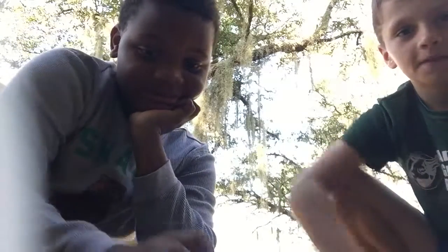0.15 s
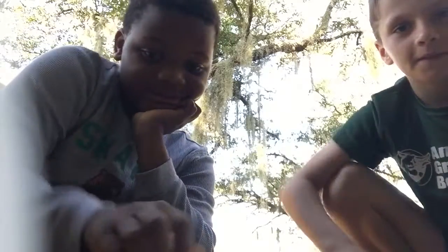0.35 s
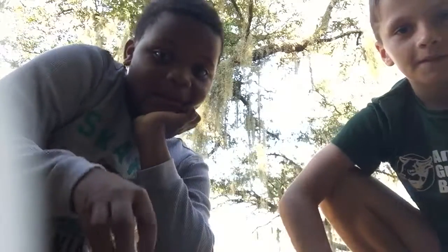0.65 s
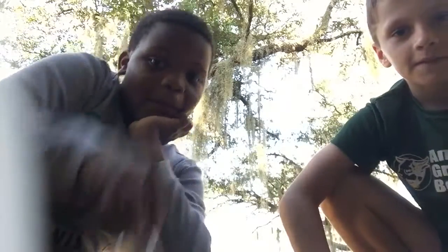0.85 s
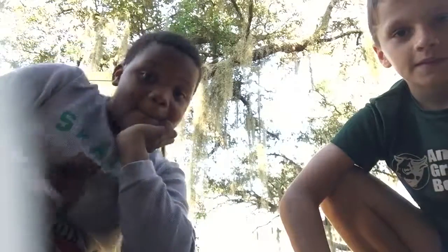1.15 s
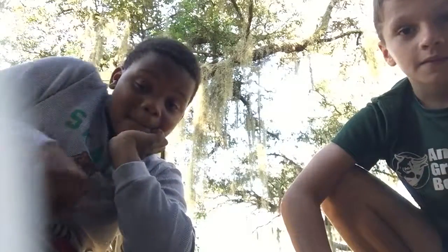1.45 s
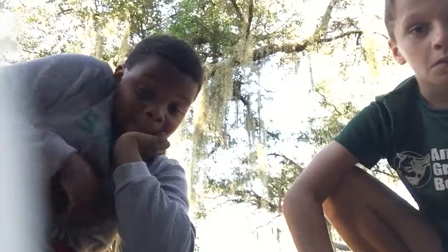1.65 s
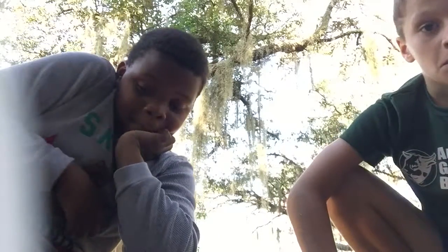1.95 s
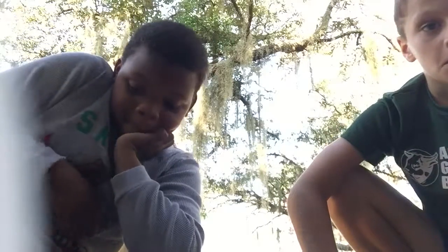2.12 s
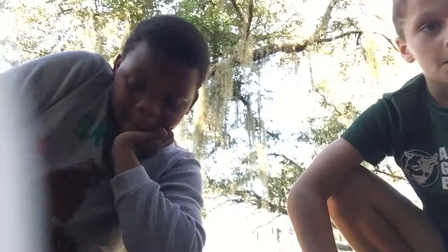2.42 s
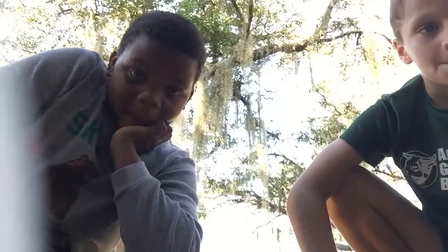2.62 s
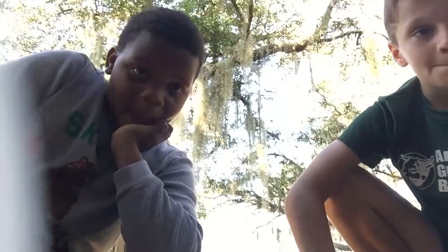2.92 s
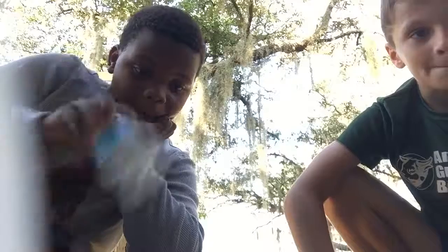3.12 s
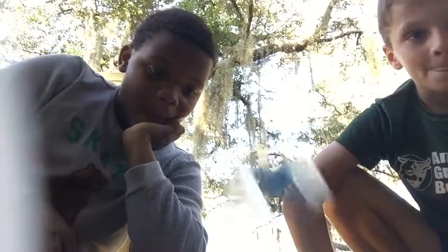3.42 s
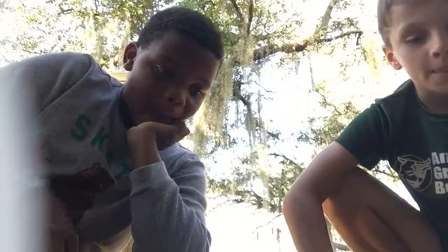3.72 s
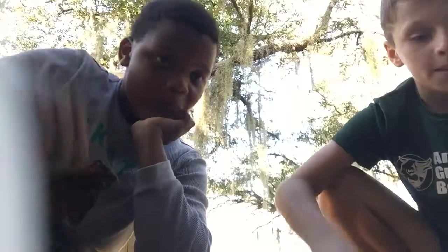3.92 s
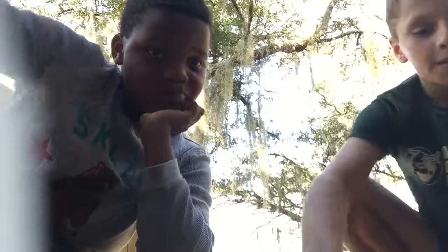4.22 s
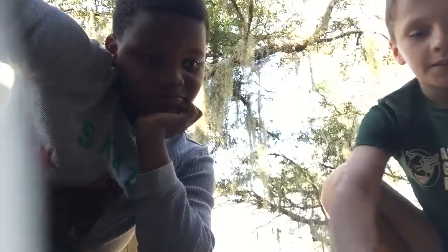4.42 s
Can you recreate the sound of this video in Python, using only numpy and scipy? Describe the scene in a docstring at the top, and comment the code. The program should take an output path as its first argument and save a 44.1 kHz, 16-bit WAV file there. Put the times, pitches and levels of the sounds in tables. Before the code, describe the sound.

A plastic bottle with some water in it is handled, tossed and lands on a hard floor, twice. The first landing is a quick cluster of crackly knocks; the second is a heavy hollow thump, slightly overloading the nearby microphone, with slapping rebounds. Between them come cloth rustle, faint clicks and wall pops. Distant steady humming and open air lie underneath, with only a short echo.

```python
"""A porch floor, microphone close: two children flip a part-filled plastic water bottle.
Sleeves rustle as shaped noise, and the thin wall pops in the hand as short pitched rings.
The bottle lands twice: damped modes, crackle and low rings, with rebounds as the water slaps down after it.
It skids as grainy noise, and is grabbed again.
Two distant motors hum as unsteady sine multiples, over a bed of outdoor air noise."""
import sys
import numpy as np
from scipy import signal
from scipy.fft import rfft, irfft, next_fast_len
from scipy.io import wavfile
from scipy.ndimage import uniform_filter1d, map_coordinates

SR = 44100
rng = np.random.default_rng(int(sys.argv[2]) if len(sys.argv) > 2 else 0)


def int16_out(signal):
    """Quantize to a 16-bit WAV file."""
    q = np.round(np.clip(np.atleast_2d(signal).T, -1, 1) * 32767)
    wavfile.write(sys.argv[1], SR, q.astype(np.int16))


N = 201081

# The bottle strikes floor or hand; weight lifts the thud, hardness the crack and snap.
# [t/s, level/dB, weight/dB, hardness/dB, loss per rebound/dB, pitch of struck patch f/Hz, its ring level/dB]
KNOCK_EVENTS = [(1.084, -29.5, -14, -5, 20, 1500, -37), (1.7539, -20, 1.5, 2, 9.5, 2470, -1.5),
                (1.822, -29, -1, -22, 5, 1430, -16.5), (1.844, -20.5, -7.5, -14, 6.5, 1150, -13),
                (1.871, -17.5, -1, -10.5, 7, 2000, -8), (1.891, -19, -7, -3.5, 18, 1493, -7),
                (2.077, -37.5, -24, -13.5, 28, 2220, -23), (2.861, -37, -3, -32, 21, 1016, -20),
                (2.8712, -32, 4.5, 0.5, 34, 756, -15), (3.181, -29.5, -22, 2.5, 12, 7000, -11),
                (3.1855, -29.5, -4, 11, 17, 1567, -5.5), (3.5306, -7.5, 0, -14.5, 15, 511, -2),
                (3.538, -11.5, -13, -6, 8.5, 1180, -7), (3.553, -14.5, 1.5, -2.5, 7.5, 745, -8),
                (3.719, -29, -20, -0.5, 7.5, 1930, -22), (3.928, -39, 6, -15, 5, 512, -28),
                (4.128, -21, -5, -6, 35, 1257, -16.5), (4.143, -19.5, -19, -9.5, 19, 1120, -27),
                (4.161, -20.5, -6, -1, 35, 1100, -13), (4.198, -15.5, -23, -4, 30, 943, -9),
                (4.229, -30, -12, -2, 24, 1297, -12), (4.3252, -33.5, -14, 4.5, 11, 1310, -28),
                (4.416, -37, -4, 1.5, 10, 2140, -26)]
# The thin wall pops under the fingers: [t/s, level/dB, f/Hz, ring above that level/dB]
POP_EVENTS = [(.012, -48, 1300, 20), (0.033, -35.5, 4960, 14.5), (.134, -41, 3880, 11),
              (.216, -43, 1880, 6), (0.265, -36, 6200, 6), (.283, -37, 3370, 3), (0.348, -35, 5200, 3),
              (.475, -38, 4400, 17), (.519, -41.5, 3980, 17), (.77, -49, 1280, 20),
              (0.846, -52.5, 1480, 20.5), (1.218, -44, 2330, 14.5), (2.545, -47.5, 3700, 11.5),
              (2.67, -43.5, 3750, 13.5), (2.8212, -21, 4610, 19.5), (3.036, -46, 3960, 12.5),
              (3.377, -66, 3980, 22), (3.681, -43, 4280, 5), (3.755, -40.5, 2240, 18)]


def amp(db):
    """Amplitude factor of a level in dB."""
    return 10 ** (np.asarray(db) / 20)


def unit(x):
    """x scaled to rms 1."""
    return x / np.sqrt(np.mean(x ** 2) + 1e-20)


def along(points, hz):
    """Interpolate (f/Hz, value) points on a log frequency axis."""
    f, values = np.transpose(points)
    return np.interp(np.log(hz + 1), np.log(f), values)


def wobble(rate):
    """A smooth random curve through rate knots a second."""
    knots = rng.standard_normal(int(N * rate / SR) + 4)
    return map_coordinates(knots, [np.arange(N) * rate / SR])


def filtered(x, response):
    """x with its spectrum multiplied by a function of frequency."""
    size = next_fast_len(N + SR // 2)
    hz = np.fft.rfftfreq(size, 1 / SR)
    return irfft(rfft(x, size) * response(hz), size)[:N]


def coloured(x, spectrum):
    """x filtered by (f/Hz, level/dB) points, then scaled to rms 1."""
    return unit(filtered(x, lambda hz: amp(along(spectrum, hz))))


def add(track, s, sound):
    """Mix a sound into the track at time s."""
    place = track[max(0, round(s * SR)):][:len(sound)]
    place += sound[:len(place)]


def hum(hz, orders, drift=0.061, waver_db=1):
    """A distant motor: multiples of its shaft speed, with drifting phase (rad) and wavering levels."""
    turn = 2 * np.pi * hz * np.arange(N) / SR + drift * wobble(3.4)
    out = np.zeros(N)
    for multiple, db in orders:
        level = np.sqrt(2) * amp(db + waver_db * wobble(14))  # rms to peak
        out += level * np.sin(multiple * turn + rng.uniform(0, 2 * np.pi))
    return out


def motors():
    """Two distant motors turn at different shaft speeds, each with its own set of multiples."""
    # Tones of each motor: [multiple of shaft speed, mean level/dB rms]
    slow_motor = [(2, -59), (3, -50), (4, -47), (5, -57.5), (7, -58.5), (8, -63)]
    fast_motor = [(2, -50), (3, -55), (4, -66.5)]
    return hum(52.8, slow_motor) + hum(96.7, fast_motor)


def outdoor_air(level_db=-46.5):
    """The air around the porch: steady noise, strongest in the low-mids."""
    # Spectrum of the open air: [f/Hz, level/dB per Hz]
    air_spectrum = [(25, -34), (55, -30), (85, -12.5), (200, 2.5), (330, 1.5), (500, -12.5), (800, -10.5),
                    (1300, -10), (2100, -17.5), (2700, -38), (4500, -43), (6500, -56.5), (9000, -61),
                    (16000, -81)]
    return amp(level_db) * coloured(rng.standard_normal(N), air_spectrum)


def strokes():
    """Envelopes of rub, swish and hiss: each stroke rises, holds and falls away."""
    # Sleeves and hands slide; bright strokes hiss, dull ones rub; levels precede the layer gains.
    # [t/s, length/s, level/dB, brightness/dB]
    slides = [(0, 0.019, -38.5, -7), (.02, 0.12, -49, -10), (0.146, .11, -45, -6.5),
              (0.258, 0.029, -39, 6.5), (0.288, 0.12, -46, -4.5), (0.361, 0.015, -39, 6),
              (0.432, 0.17, -51, -5), (0.539, 0.083, -48.5, -4), (0.635, 0.026, -44, 5),
              (0.696, 0.32, -49.5, 0), (0.878, 0.031, -53, 19), (1.028, 0.052, -38, 7.5),
              (1.121, .2, -51.5, 4.5), (1.285, 0.032, -46, 8.5), (1.348, .18, -65, 1),
              (1.895, 0.257, -62.5, -19), (2.432, 0.048, -57.5, 4.5), (2.53, 0.16, -54.5, -17),
              (2.786, 0.14, -52.5, -4), (3.027, 0.013, -50.5, 2), (3.18, 0.11, -58.5, 5.5),
              (3.245, 0.013, -36, 1.5), (3.59, 0.312, -56.5, -2), (3.905, 0.19, -53, -5.5),
              (4.166, 0.14, -51, 3), (4.306, 0.066, -47, 6), (4.368, .18, -51, 4), (4.5, 0.03, -45, -10)]
    rise, fall = 0.0071, 0.013  # time constants, s
    rub_per_bright = -0.17  # dB of rub per dB of brightness
    t, power = np.arange(N) / SR, np.zeros((3, N))
    for s, length, db, bright in slides:
        since = np.maximum(t - s, 0)
        after = np.maximum(since - length, 0)
        shape = (1 - np.exp(-since / rise)) * np.exp(-after / fall)
        levels = [db + rub_per_bright * bright, db, db + bright]
        power += np.outer(amp(levels), shape) ** 2
    return np.sqrt(power)


def patchy(x, depth_db):
    """Each moving fold favours its own frequencies for a moment."""
    z = signal.stft(x, nperseg=512)[2]
    field = uniform_filter1d(rng.standard_normal(z.shape), size=4, axis=0)  # over frequency
    field = uniform_filter1d(field, size=8, axis=1)  # over time
    return signal.istft(z * amp(depth_db * unit(field)), nperseg=512)[1][:N]


def rustle(rub_db=3, swish_db=-2, hiss_db=-8.0, grain_db=2.5, clump_db=2, stroke_db=2, patchy_db=3.5,
           crinkle_db=-2, crinkle_rate=60):
    """Cloth catches and slips in clumps of tiny grains, while the fingers crinkle the bottle."""
    # Spectra of three cloth layers and of the crinkling wall: [f/Hz, level/dB per Hz]
    rub_spectrum = [(150, -35), (300, -7), (550, 8), (900, -1.5), (1400, 4), (2300, -2.5), (3200, -16),
                    (7000, -57.5)]
    swish_spectrum = [(300, -43), (1600, -22.5), (2600, -2), (4400, 10.5), (5500, -1), (7000, -23.5),
                      (9000, -29.5), (13000, -52)]
    hiss_spectrum = [(2000, -53.5), (5000, -15), (6500, 2.5), (8200, -4.5), (10000, -8.5), (11500, -11.5),
                     (15500, -20)]
    crinkle_spectrum = [(300, -20.5), (600, 0), (1400, -8), (2300, 17.5), (4200, 2), (6000, 4.5),
                        (10000, -39.5), (16000, -30.5)]
    rub, swish, hiss = strokes()
    grip = amp(grain_db * wobble(500) + clump_db * wobble(60))

    def cloth(spectrum):
        """One layer shares the grip but also catches on its own."""
        catch = amp(stroke_db * wobble(90))
        return coloured(grip * catch * patchy(rng.standard_normal(N), patchy_db), spectrum)

    sleeves = amp(rub_db) * rub * cloth(rub_spectrum)
    sleeves += amp(swish_db) * swish * cloth(swish_spectrum)
    sleeves += amp(hiss_db) * hiss * cloth(hiss_spectrum)

    # crinkle_rate random impulses a second, each spread into a short noise burst
    impulses = (rng.random(N) < crinkle_rate / SR) * rng.standard_normal(N)
    t = np.arange(SR // 100) / SR
    burst = rng.standard_normal(len(t)) * amp(-60 * t / 0.012)  # t60 of 12 ms
    crinkles = signal.fftconvolve(impulses, burst)[:N]
    return sleeves + amp(crinkle_db) * swish * coloured(crinkles, crinkle_spectrum)


def blows():
    """Rows (s, thud, knock, crack, snap dB) for every knock, its rebounds and every pop."""
    # Balance of a pop, one row of [thud/dB, knock/dB, crack/dB, snap/dB]
    pop_balance = [-15, -5, -2, -10]
    rebound_s, strike_count = 0.0117, 3  # the count includes the first strike
    softer_db = 0.5  # hardness lost at each rebound
    snap_db, snap_grows = -12, 1.25  # snap relative to the knock, and its growth per dB of hardness
    rows = [(s, *(db + np.array(pop_balance))) for s, db, *patch in POP_EVENTS]
    for s, db, weight, hardness, loss, *patch in KNOCK_EVENTS:
        for k in range(strike_count):
            level, hard = db - k * loss, hardness - k * softer_db
            snap = level + snap_db + snap_grows * hard
            rows.append((s + k * rebound_s, level + weight, level, level + hard, snap))
    return rows


def contacts(scatter_db=2.0, rise=0.000088, level_db=-1):
    """Each contact rings the bottle and crackles its wall; hard ones are bright, water-laden ones deep."""
    # Bands of thud, knock, crack and snap: [low f/Hz, high f/Hz]
    band_edges = [(70, 450), (450, 1800), (1800, 5500), (5500, 16000)]
    # Those four bands die at their own speeds: [noise t60/s, share of noise 0-1]
    band_decay = [(0.19, 0.22), (0.033, 0.46), (0.025, 0.53), (0.022, 1)]
    # Modes of the water-loaded bottle on the floor: [f/Hz, mean level/dB, t60/s]
    bottle_modes = [(208, 0, 0.043), (261.2, 1.5, 0.13), (302, 3.5, 0.089), (362, -0.5, 0.066),
                    (412.5, 0.5, 0.072), (470, -18, .05), (515, 4.5, 0.084), (674, -2.5, 0.083),
                    (736, 4.5, 0.081), (870, -16.5, 0.026), (1018, 6, 0.065), (1178, 7.5, 0.045),
                    (1311, 12, 0.037), (1510, -17.5, 0.027), (2002, 2.5, 0.03), (2160, 8, 0.039),
                    (2374, 5.5, 0.033), (3310, 3, 0.034), (3977, 5.5, 0.025), (4736, -17.5, .03),
                    (6500, 4.5, 0.022)]
    out, t = np.zeros(N), np.arange(SR // 5) / SR
    span = SR / 100  # levels are rms over 10 ms
    hz, mode_db, mode_t60 = np.transpose(bottle_modes)[:, :, None]
    filters = [signal.butter(4, band, "band", fs=SR, output="sos") for band in band_edges]
    for s, *levels in blows():
        strength, detune, sign = rng.standard_normal((3, len(bottle_modes), 1))
        # the water shifts, so the modes differ a little from blow to blow
        waves = np.sign(sign) * np.sin(2 * np.pi * hz * (1 + 0.017 * detune) * t)
        decay = amp(mode_db + scatter_db * strength - 60 * t / mode_t60)
        ring = np.sum(decay * waves, axis=0)
        for sos, db, (t60, share) in zip(filters, levels, band_decay):
            crackle = rng.standard_normal(len(t)) * amp(-60 * t / t60) * (1 - np.exp(-t / rise))
            tone, noise = signal.sosfilt(sos, [ring, crackle])
            blow = unit(np.sqrt(1 - share) * unit(tone) + np.sqrt(share) * unit(noise))
            add(out, s, amp(db + level_db) * np.sqrt(span / len(t)) * blow)
    return out


def rings(rise=0.00054, rough=0.12):
    """Wall patches and low bottle rings each sound one pitch, its phase shaken (rad rms) by the water."""
    # Low rings of the bottle, gulps and struck shell, each with its own length:
    # [t/s, f/Hz, starting level/dB, t60/s]
    low_rings = [(1.085, 248, -18.5, 0.083), (1.086, 184.7, -20.5, 0.31), (1.087, 385.5, -28.5, .18),
                 (1.166, 195.2, -24, 0.18), (1.781, 345, -11, 0.074), (1.8715, 515, -2.5, 0.027),
                 (2.8645, 369, -12, 0.062), (3.186, 541, -21.5, .12), (3.531, 195.4, -4, 0.1)]
    # Low-pitched wall patches ring longer: [f/Hz, t60/s]
    wall_decay = [(500, 0.045), (1200, 0.036), (2400, 0.015), (4500, 0.016)]
    patches = [(s, hz, db) for s, *blow, hz, db in KNOCK_EVENTS]
    patches += [(s, hz, db + ring) for s, db, hz, ring in POP_EVENTS]
    tones = [(s, hz, db, along(wall_decay, hz)) for s, hz, db in patches]
    out, t = np.zeros(N), np.arange(SR // 4) / SR
    for s, hz, db, t60 in tones + list(low_rings):
        shake = rough * unit(uniform_filter1d(rng.standard_normal(len(t)), size=120))
        envelope = amp(db - 60 * t / t60) * (1 - np.exp(-t / rise))
        add(out, s, envelope * np.sin(2 * np.pi * hz * t + shake))
    return out


def skids(grain_db=2.5, sag_db=5):
    """Ribbed plastic chatters over the floor in dense little slips."""
    # The bottle skids and its water churns between blows: [t/s, length/s, mid-skid level/dB]
    slips = [(1.042, 0.047, -40.5), (1.746, 0.069, -26), (1.812, 0.075, -29), (1.869, 0.035, -24),
             (3.162, 0.024, -36), (3.527, 0.069, -25), (3.71, 0.19, -54), (4.112, 0.065, -36.5)]
    # Spectrum of plastic on the floor: [f/Hz, level/dB per Hz]
    skid_spectrum = [(200, -21.5), (600, 4.5), (1000, -15.5), (1400, 1), (2400, -5), (3300, -15),
                     (4600, -6.5), (5800, -20), (9000, -22.5), (16000, -26)]
    t, force = np.arange(N) / SR, np.zeros(N)
    for s, length, db in slips:
        u = np.clip((t - s) / length, 0, 1)
        force += amp(db - sag_db * (u - .5)) * np.sqrt(np.abs(np.sin(np.pi * u)))
    grains = amp(grain_db * wobble(1100)) * rng.standard_normal(N)
    return force * coloured(grains, skid_spectrum)


def clicks(t60=0.011):
    """Tiny dry, bright clicks: noise that dies at once, without a ring."""
    # When they fall: [t/s, starting level/dB]
    click_events = [(1.173, -32.5), (1.327, -24.5), (1.445, -35.5), (3.057, -48)]
    # Their spectrum: [f/Hz, level/dB per Hz]
    click_spectrum = [(1000, -20), (4000, 4), (8000, 1), (15000, -9)]
    envelope, t = np.zeros(N), np.arange(SR // 20) / SR
    for s, db in click_events:
        add(envelope, s, amp(db - 60 * t / t60))
    return envelope * coloured(rng.standard_normal(N), click_spectrum)


def landing_push(s=3.531, db=-24):
    """The weight of the water gives the floor one slow push."""
    width = .004  # s
    u = np.arange(SR // 5) / SR / width
    out = np.zeros(N)
    add(out, s, amp(db) * (1 - u) * np.exp(-u))
    return out


def radiated(x, low_hz=135):
    """A small soft bottle gives off no deep bass and little of the highest treble."""
    # How well the bottle radiates: [f/Hz, level/dB]
    radiation = [(2000, 0), (4000, 0.5), (7000, 0), (9300, -1.5), (11000, -10.5), (16000, -7)]
    x = signal.sosfilt(signal.butter(4, low_hz, "high", fs=SR, output="sos"), x)
    return filtered(x, lambda hz: amp(along(radiation, hz)))


def porch(x):
    """The porch answers with a noise tail, each frequency dying at its own speed."""
    # Reverberation of the place: [f/Hz, t60/s]
    porch_decay = [(150, 0.25), (600, 0.15), (2300, 0.31), (4800, .3), (9000, 0.16), (14000, 0.16)]
    hz, t, z = signal.stft(rng.standard_normal(SR // 2), SR, nperseg=256)
    fade = amp(-60 * t / along(porch_decay, hz)[:, None])
    tail = signal.istft(z * fade, SR, nperseg=256)[1]
    return signal.fftconvolve(x, tail / np.linalg.norm(tail))[:N]


def scene():
    """Bottle and sleeves close by, over the hum and the outdoor air."""
    background = motors() + outdoor_air()
    body = radiated(contacts() + skids())
    pitched = radiated(rings())
    # the pitched rings get a fainter echo than the blows
    echo = porch(amp(-22.5) * body + amp(-31.0) * pitched)
    close = body + pitched + rustle() + clicks() + landing_push()
    return (close + echo + background)[None]


def record(dry):
    """The hardest blows overload the microphone; nothing passes above its band limit."""
    top_hz = 16000
    clipped = dry[0] / (1 + np.abs(dry[0]) ** 6) ** (1 / 6)
    return filtered(clipped, lambda hz: 1 / (1 + (hz / top_hz) ** 160))[None]


dry = scene()
out = record(dry)
int16_out(out)
```